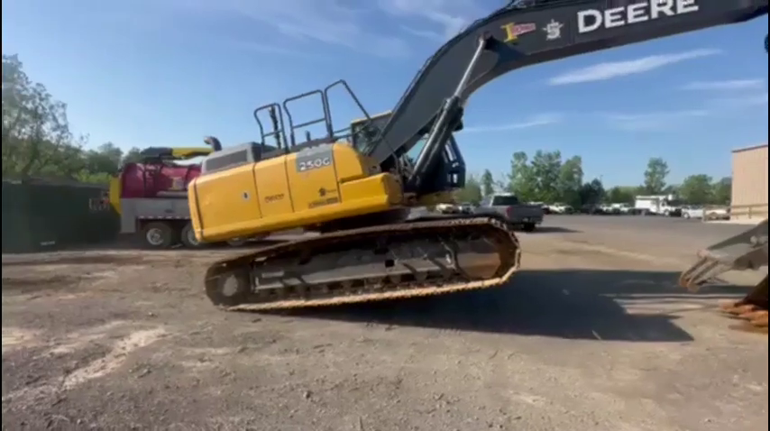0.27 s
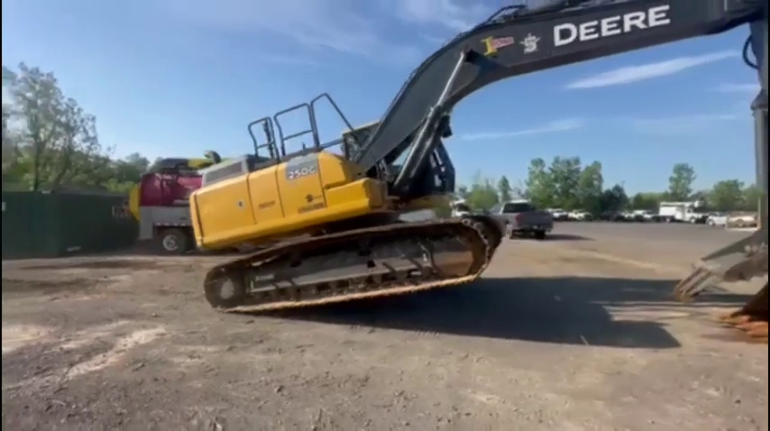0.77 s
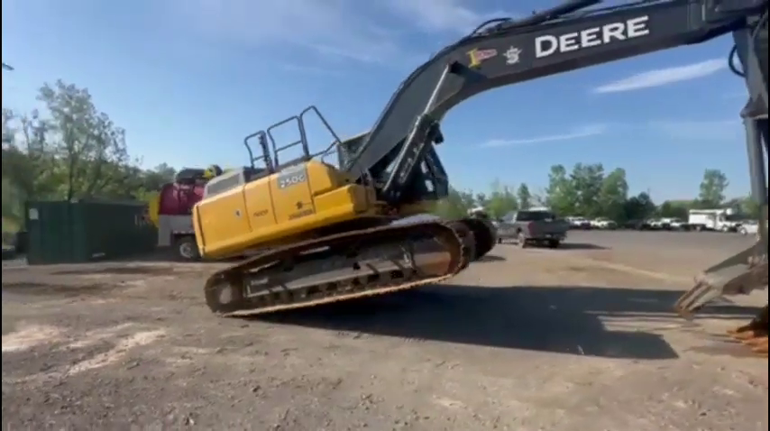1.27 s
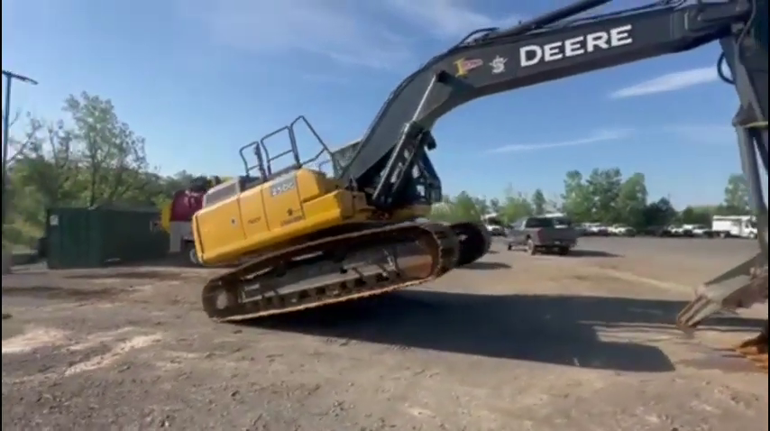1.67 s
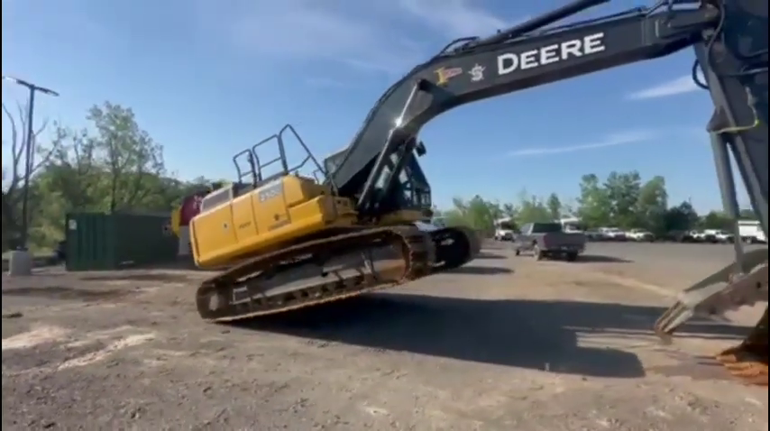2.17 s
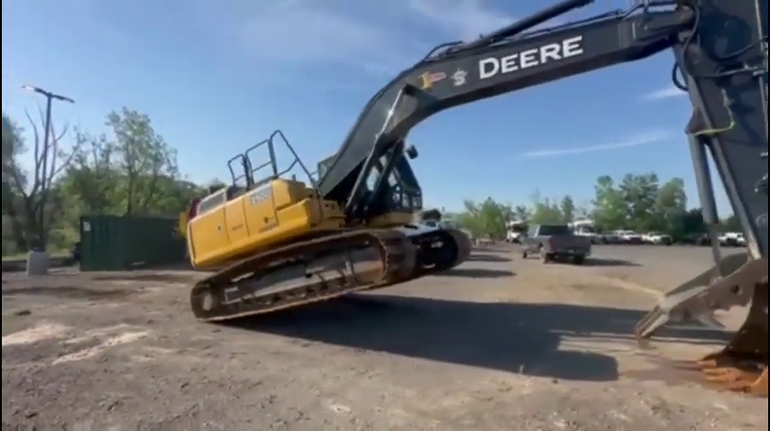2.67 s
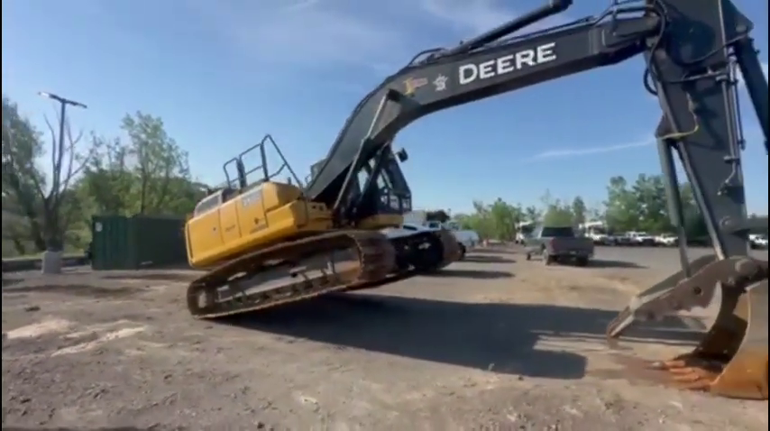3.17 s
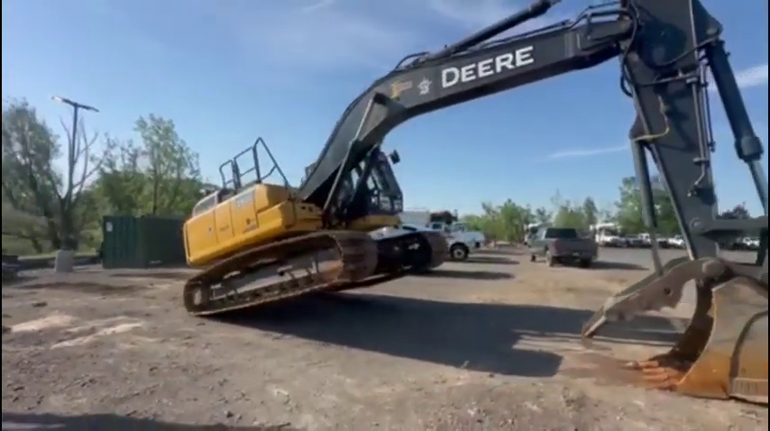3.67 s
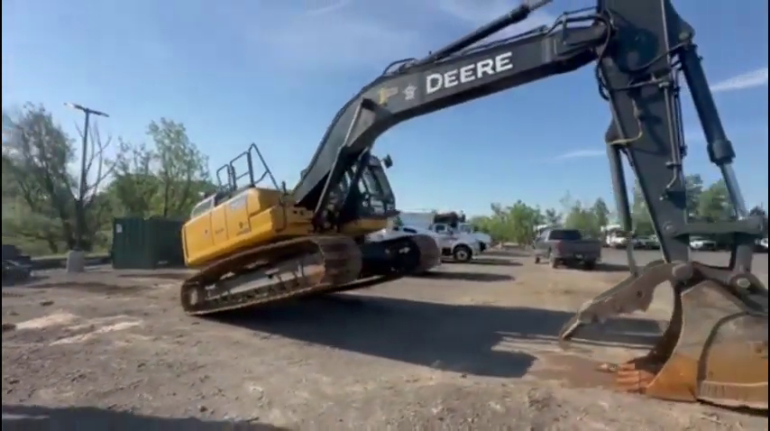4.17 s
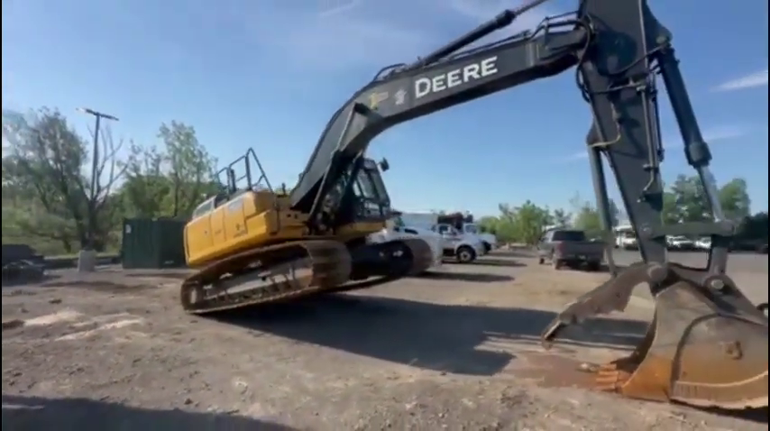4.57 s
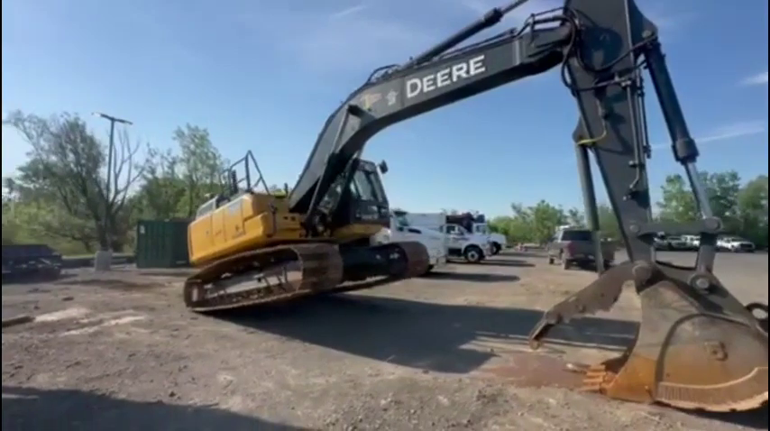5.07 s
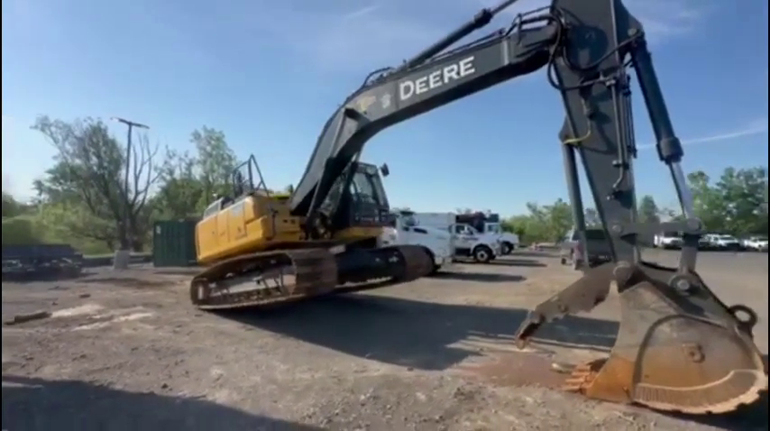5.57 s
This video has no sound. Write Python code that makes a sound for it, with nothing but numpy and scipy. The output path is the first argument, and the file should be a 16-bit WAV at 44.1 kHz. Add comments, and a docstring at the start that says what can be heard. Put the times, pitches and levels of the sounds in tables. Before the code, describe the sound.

After a tiny silence, a large diesel excavator drones at fast idle across an open gravel yard, with broad mechanical roar and quick clatter. A handheld stereo microphone is carried nearer; wind rumbles and thumps on it, and from about one second sharp knocks tick close on the left. The engine briefly revs slightly near two seconds, a short creak follows later, and a thin turbo whistle rises at the end.

```python
"""After a brief silence a six-cylinder diesel excavator runs at a fast idle across an open yard: crank-locked
tones, a roar of shaped noise and repeating clatter, and faint strands of turbocharger whistle. A walker
carries a two-port microphone nearer: noise and low swings make the wind, and from 1 s damped housing modes
sound as something small knocks by the left port. Near 2 s the engine speed surges, then settles; at 3.7 s
something rubbing close by creaks in a run of slips; the whistle, faded by then, returns louder at the end."""
import sys
import numpy as np
from scipy import signal
from scipy.io import wavfile
from scipy.ndimage import uniform_filter1d, map_coordinates

SR = 44100
rng = np.random.default_rng(int(sys.argv[2]) if len(sys.argv) > 2 else 0)


def file_out(sig):
    """Save sig as 16-bit WAV at sys.argv[1]."""
    # one column per channel
    cols = np.atleast_2d(sig).T
    # limit, then scale
    lim = np.clip(cols, -1, 1)
    pcm = np.round(lim * 32767).astype(np.int16)
    wavfile.write(sys.argv[1], SR, pcm)


def level_to_linear(level):
    """Convert decibel levels to linear amplitude factors, elementwise."""
    exponent = np.asarray(level, float) / 20
    return 10 ** exponent


N = 256662


def evened(x):
    """Power normalisation: scales a signal to rms 1."""
    return x / np.sqrt(np.mean(x ** 2) + 1e-20)


def read(points, hz):
    """Spectral interpolation: reads a spectrum table along log frequency."""
    f, value = np.transpose(points)
    return np.interp(np.log(hz + 1), np.log(f + 1), value)


def curve(rows, t):
    """Linear interpolation: every column of a time table at the times t."""
    s, *columns = np.transpose(rows)
    return [np.interp(t, s, c) for c in columns]


def drift(t, top_hz, low_hz=.3):
    """Random-phase superposition: sixteen slow sines make a fluctuation of rms 1."""
    rates_hz = np.geomspace(low_hz, top_hz, num=16)
    return evened(sum(np.sin(2 * np.pi * (f * t + rng.random())) / np.sqrt(f) for f in rates_hz))


def patchwork(frames, bins, across, along):
    """Correlated randomness: a bins x frames field of rms 1, smoothed across bins and along frames."""
    field = uniform_filter1d(rng.standard_normal((frames, bins)).T, size=across, axis=0)
    return evened(uniform_filter1d(field, size=along, axis=1))


def ring(hz, t60, rise_s, glide=0, size=900):
    """Modal decay: one mode builds up over rise_s and dies exponentially; its pitch may sag."""
    t = np.arange(size) / SR
    rise = np.sin(np.pi / 2 * np.minimum(t / rise_s, 1)) ** 2
    turns = hz * np.cumsum(1 / (1 - 1000 * glide * t)) / SR
    shape = level_to_linear(-60 * t / t60) * rise * np.sin(2 * np.pi * turns)
    return shape / abs(shape).max()


# Crankshaft speed: steady, overshoots when the load drops, sags below, then recovers
# columns: time_s, speed_rpm
CRANK_SPEED = [(0, 1744.5), (.65, 1744), (1.8, 1749), (1.95, 1776), (3.0, 1750), (3.4, 1732), (4.3, 1733),
               (5.25, 1743), (5.82, 1735)]
# Delay of the left port behind the right (negative leads); columns: time_s, lag_samples
PORT_LAG = [(0, -7), (3.92, -7), (4.0, 35), (5.82, 35)]


def cycles():
    """Phase accumulation: integrates crank speed into engine cycles elapsed as heard at each port."""
    t = np.arange(N) / SR
    rpm = curve(CRANK_SPEED, t)[0] * (1 + .0006 * drift(t, 6))
    turns = np.cumsum(rpm) / 120 / SR - .125  # two crank turns to a cycle
    return np.array([np.interp(t - curve(PORT_LAG, t)[0] / SR, t, turns), turns])


# Place along the walk: four standpoints, each hearing other faces of the machine
# columns: time_s, standpoint_0_to_3
WALK_PATH = [(0, 0), (1.0, 0), (1.8, .3), (2.0, .7), (2.6, 1), (3.1, 1), (3.5, 2), (4.2, 2), (4.7, 3),
             (5.82, 3)]
# Tones of firing (6), pump pistons (14), fan and gear teeth; column: multiple_of_engine_cycle
TONE_ORDERS = [6, 9, 12, 14, 19, 28, 42, 48, 56, 58, 59, 60, 61, 65, 66, 67, 68, 70, 72, 84, 94, 69, 96, 98,
               105, 136]
# Mean level of each order; columns: level_db (rms) at standpoint 0, 1, 2, 3
TONE_LEVELS = [(-41, -46, -46, -42), (-55, -40, -50, -50), (-44, -49, -50, -44), (-44, -60, -52, -45),
               (-60, -51, -52, -56), (-48, -62, -56, -52), (-50, -65, -54, -53), (-53, -65, -59, -58),
               (-50, -63, -54, -52), (-46.5, -58, -57, -58), (-60, -53, -55, -58), (-40.5, -42.5, -46, -44),
               (-64, -45, -45.5, -57), (-56, -60, -59, -49.5), (-54, -60, -60, -58), (-56, -54, -49, -56),
               (-52.5, -51, -53, -49), (-41.5, -59, -51, -56), (-44, -64, -59, -51), (-57, -64, -52, -52),
               (-55, -60, -54, -50), (-54, -54, -56, -54), (-53, -57, -50, -50), (-49, -65, -54, -54),
               (-60, -66, -60, -49), (-54, -62, -59, -65)]


def orders(turns):
    """Harmonic synthesis: crank-locked tones, each swelling as the walker crosses its reflections."""
    t = np.arange(N) / SR
    place = curve(WALK_PATH, t)[0]
    slow = t[::441]
    walking = np.minimum(place[::441], 1)
    out = np.zeros((2, N))
    for k, levels_db in zip(TONE_ORDERS, TONE_LEVELS):
        waver_db = np.interp(t, slow, (1.3 + 1.4 * walking) * drift(slow, 12, .8))
        # phases in cycles: nearly in step, so the mostly even orders throb about once a crank turn;
        # low orders throb earlier, high ones later
        lead = k * (.08 * (k < 64) - .2 * (k > 90))
        port_skew = np.array([[0], [.06 * rng.standard_normal()]])
        shake = np.interp(t, slow, .07 * walking * drift(slow, 14))  # walking shakes the path
        phase = .025 * rng.standard_normal() + lead + port_skew + shake
        level = np.sqrt(2) * level_to_linear(np.interp(place, range(4), levels_db) + waver_db)
        out += level * np.cos(2 * np.pi * (k * turns[1] + phase))
    return out


def twist(frames, bins, radians):
    """Phase decorrelation: reflections turn the phase between the ports differently in each band."""
    return np.exp(1j * radians * patchwork(frames, bins, across=6, along=60))


def noise(colour_db, same, frames, size, radians):
    """Partial coherence: two-port noise from a bins x frames field of dB, the left shifted by the port lag."""
    a, b, c, d = rng.standard_normal((frames, size // 2 + 1, 4)).T
    hz = np.fft.rfftfreq(size, 1 / SR)[:, None]
    t = np.arange(frames) * size / 4 / SR
    right = a + 1j * b
    shared = same * right * twist(frames, len(hz), radians)
    own = np.sqrt(1 - same ** 2) * (c + 1j * d)
    left = (shared + own) * np.exp(-2j * np.pi * hz * curve(PORT_LAG, t)[0] / SR)
    spectrum = np.array([left, right]) * level_to_linear(colour_db)
    return signal.istft(spectrum, nperseg=size, noverlap=size * 3 // 4)[1][:, :N]


# Relative spectra of block, fan and exhaust, far off and closer in; columns: pitch_hz, density_db
FAR_SPECTRUM = [(150, -41.5), (250, -10.5), (343, -30), (586, -12.5), (775, -23), (850, -8.5), (1080, -10),
                (1190, -9), (1390, -11), (2130, -25), (2500, -18), (3260, -38), (3940, -29), (6630, -42.5),
                (9230, -48.5), (10800, -81), (14100, -117)]
NEAR_SPECTRUM = [(150, -33), (250, -4.5), (414, -21), (477, -28), (707, -3), (868, -5.5), (1210, -10),
                 (1560, -8.5), (2070, -18), (2540, -21), (3310, -24), (4990, -33.5), (9380, -41.5),
                 (10100, -44.5), (10800, -108), (14100, -121)]
# Relative level of the roar; columns: time_s, level_db
ROAR_LEVEL = [(.1, -49), (1.0, -48), (1.75, -46.5), (2.4, -50), (3.0, -48), (3.4, -47.5), (4.3, -45.5),
              (4.8, -46.5), (5.82, -45)]
# Ripple of the microphone port; columns: pitch_hz, gain_db
PORT_RIPPLE = [(4700, 1.5), (5000, 2.5), (5300, 1.5), (5650, 0), (6050, 4.5), (6400, 1.5)]


def roar_colour(frames, hz):
    """Spectral filtering: far colour gives way to near; a yard echo combs it and the port ripples it."""
    t = np.arange(frames) * 256 / SR
    near = np.clip(.34 + (.76 - .34) * t * SR / N, 0, 1)  # share of the close-in colour
    band = (hz > 1200) & (hz < 9000)  # levels the two colours by their power here
    shapes = [read(s, hz) for s in (FAR_SPECTRUM, NEAR_SPECTRUM)]
    far_db, near_db = (s[:, None] - 10 * np.log10(np.sum(level_to_linear(2 * s[band]))) for s in shapes)
    patches = patchwork(frames, 513, across=14, along=20)
    colour_db = (1 - near) * far_db + near * near_db + curve(ROAR_LEVEL, t)[0]
    colour_db += 1.26 * patches + 0.28 * drift(t, 24)
    echo_s, echo_share = 0.000449, 0.14
    comb = abs(1 + echo_share * np.exp(-2j * np.pi * hz * echo_s))
    return colour_db + 20 * np.log10(comb)[:, None] + read(PORT_RIPPLE, hz)[:, None]


# Likeness of the airflow at the two ports; columns: pitch_hz, coherence_share
AIR_LIKENESS = [(60, 0.92), (300, 0.26), (900, 0.26), (1600, 0.04), (2600, 0.059), (5000, 0.89),
                (10000, 0.1)]


def airflow(turns, colour_db, hz):
    """Amplitude modulation: coloured noise throbs with the firing."""
    same = np.clip(read(AIR_LIKENESS, hz), 0, 1)[:, None]
    air = noise(colour_db + 9.0, same, colour_db.shape[1], size=1024, radians=1.0)
    return air * (1 + .08 * np.cos(2 * np.pi * 6 * turns) + .03 * np.cos(2 * np.pi * 2 * turns))


def clatter(turns, colour_db, hz):
    """Periodic noise: valve and injector clatter repeats every engine cycle, changing with standpoint."""
    tables = rng.standard_normal((3, 4, 3031))  # one cycle for each of four standpoints
    tables = tables[0] + 1.1 * tables[1:]  # each port hears its own mix of reflections
    place = curve(WALK_PATH, np.arange(N) / SR)[0]
    strikes = np.array([map_coordinates(own, [place, side % 1 * 3030], order=1)
                        for own, side in zip(tables, turns)])
    strikes *= 1 + .3 * np.cos(2 * np.pi * 2 * turns)  # loudest at one crank angle
    z = signal.stft(evened(strikes), nperseg=1024, noverlap=768)[2]
    # favours 500-2800 Hz
    middle = np.clip(hz / 500, 0, 1)[:, None] * np.clip(2800 / (hz + 1), 0, 1)[:, None] ** 2
    z *= level_to_linear(colour_db[:, :z.shape[2]] + 27.5) * middle
    return signal.istft(z, nperseg=1024, noverlap=768)[1][:, :N]


def roar(turns):
    """Superposition: broad mechanical roar sums airflow and cyclic clatter, slightly stronger at the left."""
    hz = np.fft.rfftfreq(1024, 1 / SR)
    colour_db = roar_colour(N // 256 + 5, hz)
    both = airflow(turns, colour_db, hz) + clatter(turns, colour_db, hz)
    return both * level_to_linear([[.8], [-.8]])


# Turbocharger whistle, of its reference strand; columns: time_s, level_db (relative), pitch_hz
WHISTLE = [(0, -65.5, 5200), (.6, -63, 5115), (1.2, -95, 5200), (4.6, -67, 5325), (5.25, -56, 5310),
           (5.5, -56, 5360), (5.62, -51, 5370), (5.7, -51, 5430), (5.82, -50, 5360)]


def whine():
    """Narrowband modulation: wandering whistle strands in a haze, growing as the engine bay comes near."""
    t = np.arange(N) / SR
    db, hz = curve(WHISTLE, t)
    # pitch ratio, level_db, width_hz, steady share against the fuzz
    strands = ((1, 1, 30, 2), (1.035, -9, 60, 0), (.93, -1, 40, 1.5), (.96, -2, 320, 0))
    out = 0
    for ratio, part_db, width_hz, clean in strands:
        fuzz = signal.lfilter([1], [1, -np.exp(-np.pi * width_hz / SR)], rng.standard_normal((2, N)))
        fuzz = evened(fuzz) + clean
        wandering_hz = hz * ratio * (1 + .003 * drift(t, 9, 1.5))
        port_skew = np.array([[0], [2 * np.pi * rng.random()]])
        angle = 2 * np.pi * np.cumsum(wandering_hz) / SR + port_skew
        strand = fuzz[0] * np.cos(angle) + fuzz[1] * np.sin(angle)
        out = out + level_to_linear(part_db) * evened(strand)
    return level_to_linear(db) * out


# Relative spectrum of the buffeting; columns: pitch_hz, density_db
WIND_SPECTRUM = [(12, -68), (20, 2), (53, 1.5), (135, 3.5), (190, -0.5), (235, -10), (280, -7), (343, -13),
                 (500, -17), (650, -28.5), (1100, -120)]
# Course of the wind before its random gusting
# columns: time_s, level_db, left_over_right_db, upper_flutter_db (relative)
WIND_COURSE = [(.07, -44.5, 1, 8), (.4, -32.5, -3.5, -1), (1.0, -32, -1, 0), (1.5, -32, -3.5, -2.5),
               (2.05, -29, 0, 1.5), (2.3, -35, -1.5, -1), (2.7, -27.5, -1.5, 0.5), (3.0, -32, -1, 4.5),
               (3.45, -28.5, -1.5, -4), (3.9, -33, -4, 3), (4.3, -27.5, -2, -1), (4.75, -26, 0, 0),
               (4.9, -22.5, 1, -1), (5.25, -23.5, -1, -0.5), (5.5, -27.5, -2, 1), (5.65, -24.5, -1, 2.5),
               (5.82, -20, 2, -3)]


def wind():
    """Turbulent pressure: lumpy low noise, wandering in phase and swelling partly apart at the ports."""
    frames, hz = N // 256 + 5, np.fft.rfftfreq(1024, 1 / SR)
    lumps = patchwork(frames, 513, across=5, along=5)
    flutter_db = curve(WIND_COURSE, np.arange(frames) * 256 / SR)[2]
    upper_db = np.interp(hz, (170, 260), (0, 1))[:, None] * flutter_db
    colour_db = read(WIND_SPECTRUM, hz)[:, None] + upper_db + 1.33 * lumps
    body = evened(noise(colour_db, 0.69, frames, size=1024, radians=1.78))
    t = np.arange(N) / SR
    db, pan_db, _ = curve(WIND_COURSE, t)
    slow = t[::441]
    # eddies swell and drop at random: one shared course, then one for each port
    flurry = np.array([np.interp(t, slow, drift(slow, 16, 2.5)) for _ in range(3)])
    gust_db = 1.3 * (flurry[0] + 0.75 * flurry[1:])
    return body * level_to_linear(db + gust_db + np.array([pan_db, -pan_db]) / 2)


# The strongest eddies slapping the ports
# columns: peak_s, envelope_peak_db, pitch_hz, left_over_right_db
EDDY_SLAPS = [(0.32, -23, 85, -1), (.42, -20.5, 192, 0), (0.612, -27, 85, 1), (1.03, -23, 81, -9),
              (1.351, -21, 60.3, -6), (1.519, -20, 65.4, -5), (2.062, -16, 78.4, -3),
              (2.782, -21.5, 259, -7), (2.799, -15, 65, -4), (2.952, -24, 109, 12), (3.065, -18, 60, 15),
              (3.23, -22, 50.7, -8), (3.521, -21.5, 69.6, -3), (4.316, -19.5, 77, 5.5),
              (4.91, -16, 73.5, 0), (5.018, -21, 60, -5), (5.236, -14, 62.4, 2), (5.642, -12.5, 115, -1),
              (5.748, -14, 62.3, -2)]


def slaps():
    """Pressure pulses: each eddy is a low swing in a bell envelope, out of step between the ports."""
    out = np.zeros((2, N))
    for (s, db, hz, pan_db), (phase, skew) in zip(EDDY_SLAPS, rng.random((len(EDDY_SLAPS), 2))):
        u = np.arange(-3 * SR // 60, 3 * SR // 60) / SR * hz  # cycles from the peak
        port_skew = np.array([[0], [.14 + .17 * skew]])
        bell = np.exp(-(u / 0.72) ** 2)
        swing = bell * np.cos(2 * np.pi * (u + phase + port_skew))
        at = round(s * SR) - len(u) // 2
        out[:, at:at + len(u)] += level_to_linear(db + np.array([[pan_db], [-pan_db]]) / 2) * swing
    return out


# Knocks on the housing, at the left port
# columns: start_s, tick_peak_db, thud_over_tick_db, hardness_db_per_octave (above 2 kHz)
HOUSING_KNOCKS = [(1.0826, -22, 0, -6), (1.3764, -11.5, -2, 0), (1.9385, -13, 2, -7),
                  (2.0250, -16.5, 3, -16), (2.7946, -9, 0, -1), (3.6225, -28, 9, -16),
                  (3.9803, -9.5, 2, -18), (4.2953, -3, -3, 3.5), (5.1133, -3, -2, -8),
                  (5.2945, -15.5, 5, -8), (5.6867, -8, 2, -4)]
# Modes of the housing before hardness and scatter; columns: pitch_hz, level_db (relative), t60_s
HOUSING_MODES = [(1150, -6, .007), (1640, 0, .0095), (2160, -5, .009), (2800, -14, .004), (3600, -15, .004),
                 (4800, -27, .003), (7200, -36, .002), (8400, -39, .002)]


def knocks():
    """Modal impact: a tick, dull thud and loose-part rattle; the right hears tick and thud late and inverted."""
    out = np.zeros((2, N + SR))
    rattle_db, rattle_t60 = -33, .09
    band = signal.butter(N=5, Wn=(1700, 4300), btype="band", fs=SR, output="sos")
    buzz = evened(signal.sosfilt(band, rng.standard_normal((2, N + SR))))
    fade = level_to_linear(-60 * np.arange(round(rattle_t60 * SR)) / SR / rattle_t60)
    late = round(.0013 * SR)  # the thud follows the tick
    thud = np.r_[np.zeros(late), ring(1200, .013, .0015, glide=-.5)[:-late]]
    tick_shield_db, thud_shield_db = 14, 7  # the body shades the tick more than the thud
    scatter = rng.standard_normal((len(HOUSING_KNOCKS), len(HOUSING_MODES)))
    for (s, db, thud_db, hard_db), chance in zip(HOUSING_KNOCKS, scatter):
        tick = 0
        for (hz, mode_db, t60), c in zip(HOUSING_MODES, chance):
            hardness_db = hard_db * max(np.log2(hz / 2000), 0)
            tick = tick + level_to_linear(mode_db + hardness_db) * ring(hz * (1 + .015 * c), t60, .0015)
        tick = level_to_linear(db) * tick / abs(tick).max()
        body = level_to_linear(db + thud_db) * thud
        at = round(s * SR)
        out[:, at:at + len(fade)] += level_to_linear(db + rattle_db + hard_db / 2) * fade * buzz[:, at:at + len(fade)]
        out[0, at:at + len(tick)] += tick + body
        far = level_to_linear(-tick_shield_db) * tick + level_to_linear(-thud_shield_db) * body
        out[1, at + 7:at + 7 + len(tick)] -= far
    return out[:, :N]


# Modes the slips ring, before scatter; columns: pitch_hz, level_db (relative), t60_s
RUBBED_MODES = [(361, -9, .2), (522, -7, .05), (694, -1, .04), (830, 0, .035)]


def creak():
    """Stick-slip friction: uneven slips of something rubbing close by ring its modes, weakening at the end."""
    start_s, length_s, gap_s = 3.675, .04, .011
    peak_db, fade_db = -20.5, -3  # of a slip, before the tilt to the left
    out = np.zeros(N)
    chances = rng.standard_normal((round(length_s / gap_s), 1 + len(RUBBED_MODES)))
    for k, (late, *sizes) in enumerate(chances):
        slip = 0
        for (hz, mode_db, t60), size in zip(RUBBED_MODES, sizes):
            slip = slip + level_to_linear(mode_db + 2 * size) * ring(hz * (1 + .02 * size), t60, .005, size=5000)
        slip *= level_to_linear(peak_db + fade_db * (k * gap_s / length_s) ** 2) / abs(slip).max()
        at = round((start_s + gap_s * (k + .1 * late)) * SR)
        out[at:][:len(slip)] += slip
    return out * level_to_linear([[2], [-2]])


def scene():
    """Linear superposition: engine, wind and handling add at the two ports."""
    turns = cycles()
    engine = orders(turns) + roar(turns) + whine()
    return engine + wind() + slaps() + knocks() + creak()


def low_pass(x):
    """Removes everything above the highest recorded frequency."""
    return signal.sosfilt(signal.butter(12, 10960, fs=SR, output="sos"), x)


def record(dry):
    """High-pass filtering: sound opens after a short silence and the microphone cuts the lowest bass."""
    start_s, open_s, close_s = .066, 0.00077, .004
    n = np.arange(N)
    opening = np.clip((n / SR - start_s) / open_s, 0, 1)
    closing = np.clip((N - n) / (close_s * SR), 0, 1)
    bass_cut = signal.butter(N=4, Wn=42, btype="high", fs=SR, output="sos")
    mix = signal.sosfilt(bass_cut, dry * opening * closing)
    return low_pass(mix)


dry = scene()
out = record(dry)
file_out(out)
```